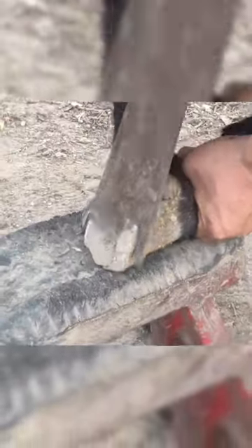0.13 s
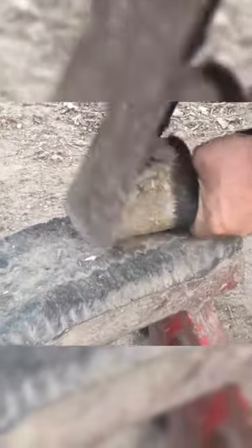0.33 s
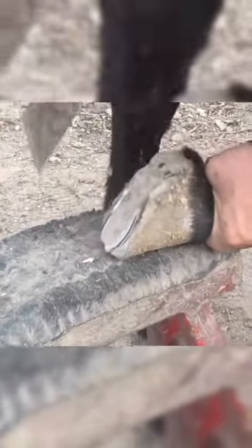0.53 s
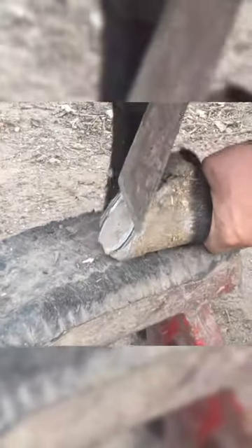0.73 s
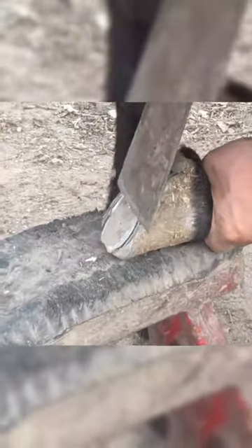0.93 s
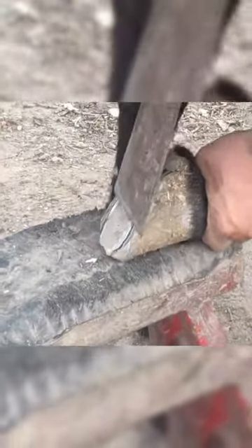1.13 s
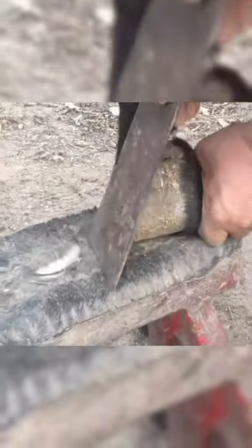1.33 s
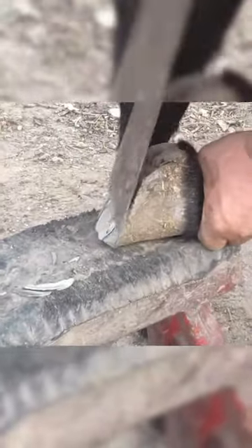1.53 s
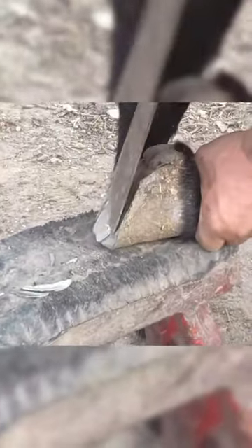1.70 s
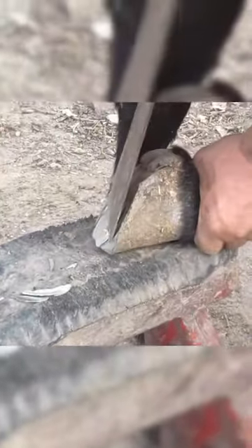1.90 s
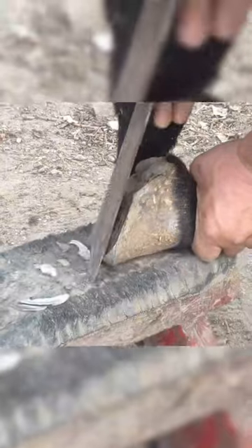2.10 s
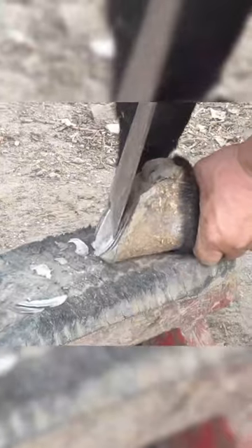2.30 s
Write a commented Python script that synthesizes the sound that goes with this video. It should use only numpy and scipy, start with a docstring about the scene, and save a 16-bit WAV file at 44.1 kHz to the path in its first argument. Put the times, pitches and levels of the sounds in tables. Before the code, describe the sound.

Blade slicing a hoof, close and dry outdoors, over faint hiss mostly left. Crackling crunch from 0.15 s swells with a squeak into hard clacks and a low wobbling thud at 0.22; the slice patters down at 0.3. Rustle at 0.64, steel scuffs and rings at 0.76. Softer cut and thud at 1.3, rustles, falling scrape at 1.95, sharp cut and thump at 2.06, chip tick at 2.27.

```python
"""A faint hiss, mostly on the left, then a crunch: a broad blade pares a hoof on a padded stand, outdoors.
Three times horn crackles under the edge, as dense random grains shaped by a spectrum, and breaks free.
The blade then knocks down and the stand thuds and wobbles, all as sums of damped sines.
In between the blade is set back on the hoof, its steel ringing in damped sines; chips tick,
the edge squeaks and scrapes in narrow noise bands, and clothing rustles as grainy band noise."""
import sys
import numpy as np
from scipy import signal
from scipy.fft import rfft, irfft
from scipy.io import wavfile

SR = 44100
rng = np.random.default_rng(int(sys.argv[2]) if len(sys.argv) > 2 else 0)


def unload_wav(signal):
    """Save mono or channel-first audio to the path in sys.argv[1] as 16-bit WAV at rate SR, clipped to [-1, 1]."""
    wavfile.write(
        sys.argv[1],
        SR,
        np.round(np.clip(np.atleast_2d(signal).T, -1, 1) * 32767).astype(np.int16),
    )


N = 103635
TIME = np.arange(N) / SR  # seconds

# Noise of loose bits shivering on the stand. Each row: frequency in Hz, relative level in dB per Hz.
SHIVER_SPECTRUM = [(40, 3.5), (120, 16), (250, 4), (450, -2.5), (1000, -1.5), (2000, -6), (4000, -16.5),
                   (8000, -24), (15000, -36)]
SHARED_BASS_HZ = 343  # below this the two sides share one noise
SQUEAK_WIDTH_HZ = 62
RUB_PAN_DB, HORN_PAN_DB = 16.5, 14


def amp(db):
    """Logarithmic level: decibels to amplitude gain."""
    return 10 ** (np.asarray(db) / 20)


def rms_one(x):
    """Normalization of power: scale to rms 1."""
    return x / np.sqrt(np.mean(x ** 2) + 1e-20)


def pan(db):
    """Interaural level difference: left louder than right by db, the louder side at gain 1."""
    gains = amp(np.array([[db], [-db]]) / 2)
    return gains / gains.max()


def curve(points):
    """Linear interpolation in time through rows of (seconds, value)."""
    return np.interp(TIME, *np.transpose(points))


def soften(x, hz, order=1):
    """Low-pass filtering."""
    sos = signal.butter(order, hz, fs=SR, output="sos")
    return signal.sosfilt(sos, x + 1e-18)


def thin(x, hz, order=2):
    """High-pass filtering."""
    sos = signal.butter(order, hz, "high", fs=SR, output="sos")
    return signal.sosfilt(sos, x + 1e-18)


def colour(x, points, ripple_db=4):
    """Spectral shaping: many small resonances ripple the given spectrum; rms 1."""
    ripple_width_hz = 130
    hz, db = np.transpose(points)
    f = np.maximum(np.fft.rfftfreq(N, 1 / SR), 1)
    heights = np.minimum(rng.standard_normal(len(f)), 1)  # dips go deeper than peaks
    ripple = ripple_db * np.interp(f / ripple_width_hz, np.arange(len(f)), heights)
    spectrum_db = np.interp(np.log(f), np.log(hz), db)
    return rms_one(irfft(rfft(x) * amp(spectrum_db + ripple), N))


def noise():
    """Partial coherence: white noise, a little alike in both ears."""
    return 0.5 * rng.standard_normal(N) + rng.standard_normal((2, N))


def grains():
    """Random point process: dense tiny fractures of uneven size."""
    fractures_per_s, spread_db = 6000, 2.2
    sizes = amp(spread_db * np.minimum(rng.exponential(1, N), 4))
    return noise() * sizes * (rng.random(N) < fractures_per_s / SR)


def flutter(hz):
    """Random modulation: noise slower than hz; rms 1."""
    return rms_one(soften(rng.standard_normal(N), hz, order=3))


def rough_tone(hz, width_hz):
    """Quadrature modulation: a narrow noise band, width_hz to each side of a pitch curve."""
    phase = 2 * np.pi * np.cumsum(hz) / SR
    return flutter(width_hz) * np.sin(phase) + flutter(width_hz) * np.cos(phase)


def decay(s, t60):
    """Exponential damping: jumps to 1 at time s and falls 60 dB in t60 seconds."""
    return (TIME >= s) * amp(-60 * np.clip((TIME - s) / t60, 0, 4))


def strike(s, modes, ratio=1):
    """Modal superposition: damped sines started at time s, their phases scaled by ratio."""
    age = TIME - s
    return sum(amp(db) * decay(s, t60) * np.sin(2 * np.pi * hz * ratio * age) for hz, db, t60 in modes)


def swell(start, end, rise, fall):
    """Growth and relaxation: Gaussian rise up to start, hold, exponential release after end."""
    return np.exp(-(np.maximum(start - TIME, 0) / rise) ** 2 - np.maximum(TIME - end, 0) / fall)


def slicing():
    """Brittle fracture: horn crackles ever harder under the edge until the slice breaks off."""
    # Each row: bite and break in seconds, level and level of the finest crackle in dB, swell up to
    # the break in dB.
    cuts = [(0.149, 0.221, -39.5, -48, 9.5), (1.253, 1.294, -43.5, -54.5, 7.5),
            (2.034, 2.06, -37.5, -52.5, 11.5)]
    # Tearing horn, then its finest crackle. Each row: frequency in Hz, relative level in dB per Hz.
    horn_spectrum = [(60, -43), (170, -11.5), (400, -20), (1000, -0.5), (1450, -4.5), (1800, 2),
                     (2500, 0.5), (3400, -9), (4400, -9), (5700, 5.5), (6700, -14.5), (9000, -27.5)]
    crackle_spectrum = [(3000, -4), (6000, 3), (8500, 4.5), (12000, -3), (15500, -1)]
    bite_s, release_s = 0.012, 0.012

    horn = colour(grains(), horn_spectrum) * pan(HORN_PAN_DB)
    crackle = colour(grains(), crackle_spectrum) * pan(-3.5)
    out = 0
    for start, end, db, crackle_db, swell_db in cuts:
        growth = amp(swell_db * np.clip((TIME - end) / (end - start), -1, 0))  # 1 at the break
        force = swell(start, end, bite_s, release_s) * growth
        out = out + force * (amp(db) * horn + amp(crackle_db) * crackle)
    return out


def squeaks():
    """Stick-slip friction: the edge catches on the horn in short gliding rasps."""
    # Each row: peak, rise and fall in seconds, level in dB, pitch at the peak in Hz,
    # glide in octaves per second, left-over-right pan in dB.
    slips = [(0.204, 0.01, 0.0074, -44.5, 2340, 3.5, -13), (1.287, 0.0078, 0.011, -45, 2757, 5, 1),
             (1.468, 0.0098, 0.07, -62.5, 2855, 0.092, 11)]
    out = 0
    for s, rise, fall, db, hz, glide, side in slips:
        pitch = hz * 2 ** (glide * np.clip(TIME - s, -0.1, 0.1))
        rasp = rough_tone(pitch, SQUEAK_WIDTH_HZ)
        out = out + amp(db) * pan(side) * swell(s, s, rise, fall) * rasp
    return out


def scrape():
    """Sliding friction: the edge skids before the last cut, a gritty rasp and thin squeal falling in pitch."""
    # Each row: time in seconds, pitch in Hz, level of each of the two bands in dB.
    path = [(1.925, 3750, -71), (1.945, 3550, -47), (1.953, 2900, -55.5), (1.963, 2327, -50),
            (2.013, 1860, -65)]
    rasp_width_hz = 410
    s, hz, db = np.transpose(path)
    pitch = np.interp(TIME, s, hz)
    level = amp(np.interp(TIME, s, db)) * (TIME > s[0]) * (TIME < s[-1])
    squeal = rough_tone(pitch, SQUEAK_WIDTH_HZ)
    rasp = rough_tone(pitch, rasp_width_hz)
    return level * (squeal + rasp) * pan(RUB_PAN_DB)


def knocks():
    """Impact excitation: each contact of the freed blade is a dead clack that also rings the hoof."""
    # Each row: time in seconds, level in dB, clack pitch in Hz, left-over-right pan in dB.
    contacts = [(0.2141, -22.5, 1130, 1.5), (0.2180, -17.5, 1144, 9.5), (0.2211, -27, 630, 4.5),
                (0.2313, -31.5, 1400, 12), (1.2956, -20, 876, 9.5), (1.2983, -28.5, 830, 5),
                (1.3036, -28, 1038, 7.5), (2.0581, -25.5, 956, 9), (2.0613, -18, 1830, 19),
                (2.063, -33, 2620, 1), (2.0637, -28, 690, 3), (2.08, -33.5, 1410, 11)]
    # Each row: frequency in Hz, level relative to the contact in dB, T60 in seconds.
    hoof_modes = [(824, -21, 0.044), (1098, -9, 0.037), (1280, -22.5, 0.052), (1753, -19, 0.036),
                  (2910, -28.5, 0.048), (5900, -27, 0.0078)]
    clack_t60_s, clack_soft_hz = 0.024, 2720
    out = 0
    for s, db, hz, side in contacts:
        clack = soften(strike(s, [(hz, 0, clack_t60_s)]), clack_soft_hz)
        out = out + amp(db) * pan(side) * (clack + strike(s, hoof_modes))
    return thin(out, 420, order=1)


def stand():
    """Damped resonance: a first press and then the full weight thump, wobble and shiver the padded stand."""
    # Each row: time in seconds, thump level in dB, thump pitch ratio, wobble and shiver levels in dB.
    thuds = [(0.2209, -22.5, 0.95, -25, -39.5), (1.3052, -30, 0.87, -30.5, -44.5),
             (2.0655, -25, 0.97, -25, -42)]
    # The thump, then the wobble before settling. Each row: frequency in Hz, relative level in dB,
    # T60 in seconds.
    thump_modes = [(238.4, -4, 0.076), (281.5, -1, 0.05), (500, -13, 0.018)]
    wobble_modes = [(99.6, -32, 0.63), (132.96, -9.5, 0.37), (256.7, -29, 0.46)]
    press_lead_s, press_db = 0.00721, -8
    phase_sag_per_s, phase_jitter = 0.307, 0.01  # the growing phase lag makes the pitch sink
    settle_s, rough_db, shiver_t60_s = 0.25, 2.5, 0.38
    pad_soft_hz, low_hz = 860, 89

    body = shaking = 0
    for s, db, ratio, wobble_db, shiver_db in thuds:
        age = np.clip(TIME - s, 0, 1)
        uneven = amp(rough_db * flutter(45) * np.minimum(age / 0.019, 1))
        settling = np.exp(-(age / settle_s) ** 4)  # friction stops the wobble
        phase_ratio = 1 - phase_sag_per_s * age + phase_jitter * flutter(21)
        for start, force in ((s - press_lead_s, amp(press_db)), (s, 1)):
            thump = amp(db) * strike(start, thump_modes, ratio)
            wobble = amp(wobble_db) * uneven * settling * strike(start, wobble_modes, phase_ratio)
            body = body + force * (thump + wobble)
        shaking = shaking + amp(shiver_db) * decay(s, shiver_t60_s)

    rattle = colour(grains(), SHIVER_SPECTRUM) * rms_one(amp(1.9 * flutter(45)))
    rattle = thin(rattle, SHARED_BASS_HZ, order=1) + soften(rattle[0], SHARED_BASS_HZ)
    body = thin(soften(body, pad_soft_hz), low_hz)
    return (body + shaking * rattle) * pan(4)


def slice_lands():
    """Multiple impacts: the first slice of horn tumbles over the pad with a dull rattle."""
    land_s, level_db, rise_s, fall_s = 0.299, -51, 0.0046, 0.04
    rattle = rms_one(thin(colour(grains(), SHIVER_SPECTRUM), 450))
    return amp(level_db) * swell(land_s, land_s, rise_s, fall_s) * rattle * pan(HORN_PAN_DB)


def blade_set():
    """Friction and modal ringing: the edge scuffs onto the horn, the steel's ring builds up and dies."""
    # Each row: frequency in Hz, relative level in dB, T60 in seconds.
    blade_modes = [(667, -11, 0.19), (742, -2.5, 0.079), (1250, -13, 0.09), (1616, 3.5, 0.1),
                   (2030, 0, 0.04), (2396, -2.5, 0.11), (2940, -8, 0.065), (3412, -2, 0.1)]
    # Scuff and soft tail. Each row: frequency in Hz, relative level in dB per Hz.
    scuff_spectrum = [(500, -6.5), (720, 0.5), (1500, 2), (3500, -7), (6000, -18.5), (15000, -40)]
    touch_s, slide_s, level_db = 0.7545, 0.008, -39.5
    scuff_db, scuff_fall_s = -1.5, 0.0057  # relative to level_db, as is the tail
    tail_db, tail_t60_s = -11.5, 0.32

    seated = touch_s + slide_s
    scuff = amp(scuff_db) * swell(seated, seated, slide_s, scuff_fall_s)
    tail = amp(tail_db) * decay(seated, tail_t60_s)
    grit = (TIME > touch_s) * (scuff + tail) * colour(noise(), scuff_spectrum)
    ring = np.clip((TIME - touch_s) / slide_s, 0, 1) * strike(touch_s, blade_modes)
    out = thin(amp(level_db) * (ring + grit), 580, order=4)
    return pan(9) * soften(out, 6670, order=2)


def chips():
    """Transient excitation: snapping horn chips crumble in bright ticks with a short, many-toned ring."""
    # Each row: time in seconds, level in dB, left-over-right pan in dB.
    ticks = [(0.159, -43.5, 0.5), (0.482, -57, 20), (2.0305, -51, 10), (2.0568, -55, 20), (2.217, -57, 1.5),
             (2.27, -43.5, 5.5)]
    # The crumble. Each row: frequency in Hz, relative level in dB per Hz.
    crumble_spectrum = [(800, -45), (2500, 4.5), (4300, -1.5), (5900, 16), (7800, -2), (11000, 2),
                        (15500, -23)]
    # The ring. Each row: frequency in Hz, level relative to the tick in dB.
    ring_tones = [(2840, -13), (3400, -15), (5930, -11.5), (6480, -26)]
    rise_s, crumble_t60_s, ring_t60_s = 0.0024, 0.061, 0.25

    crumble = colour(noise(), crumble_spectrum)
    modes = [(hz, db, ring_t60_s) for hz, db in ring_tones]
    out = 0
    for s, db, side in ticks:
        attack = np.clip((TIME - s) / rise_s, 0, 1)
        tick = crumble * decay(s, crumble_t60_s) + strike(s, modes)
        out = out + amp(db) * pan(side) * attack * tick
    return out


def rustles():
    """Random surface friction: sleeves and hands rub in grainy swishes, each around its own pitch."""
    # Each row: peak, rise and fall in seconds, level before filtering in dB, centre frequency in Hz.
    rubs = [(0.644, 0.014, 0.054, -57.5, 2860), (1.078, 0.053, 0.1, -55, 2520),
            (1.468, 0.016, 0.17, -61, 4260), (1.745, 0.023, 0.037, -51, 3290),
            (1.95, 0.028, 0.077, -53.5, 3240)]
    half_width_octaves, grain_db, grain_hz = 0.58, 1.6, 118
    hz = np.geomspace(200, 15000, 30)
    out = 0
    for s, rise, fall, db, centre in rubs:
        shape_db = -10 * np.log10(1 + (np.log2(hz / centre) / half_width_octaves) ** 4)
        out = out + amp(db) * swell(s, s, rise, fall) * colour(noise(), np.c_[hz, shape_db])
    grain = rms_one(amp(grain_db * flutter(grain_hz)))
    return thin(soften(out * grain, 6290, order=8), 1700, order=3) * pan(RUB_PAN_DB)


def background():
    """Incoherent superposition: faint noise, a wandering narrow band, a midrange band and a high hiss."""
    # Noise, then high hiss. Each row: frequency in Hz, relative level in dB per Hz.
    air_spectrum = [(25, -3.5), (55, 1), (90, -7), (200, -8.5), (450, -19), (630, -18.5), (830, -7),
                    (1100, -23), (1480, -10), (1900, 2), (2500, -3), (3200, -13.5), (5000, -23),
                    (9000, -61)]
    hiss_spectrum = [(2000, -27), (3600, 2), (5000, 2.5), (5800, 11), (6700, -2), (7500, -26.5),
                     (14000, -23.5)]
    # Each row: time in seconds, change of the noise level in dB.
    air_change = [(0, 2.5), (0.95, 0), (1.22, 0.5), (1.6, -2), (2.34, 1.5)]
    # High hiss, then midrange. Each row: time in seconds, level in dB.
    hiss_level = [(0, -63), (0.27, -61.5), (0.6, -70.5), (0.83, -67.5), (0.99, -75.5), (1.1, -65.5),
                  (1.36, -63.5), (1.66, -73.5), (1.9, -72.5), (2.34, -63)]
    mid_level = [(0, -65), (0.55, -72), (1.4, -69.5), (1.58, -88), (2.34, -74)]
    # Each row: time in seconds, centre of the wandering band in Hz, level in dB.
    whir_path = [(0, 701, -70), (0.428, 937.5, -62.5), (0.697, 827, -71.5), (1.0, 850, -86),
                 (1.241, 889.5, -59), (1.55, 841, -74), (1.821, 770, -66), (1.97, 808.5, -78)]
    air_db, whir_width_hz = -61, 77.3
    mid_hz, mid_width_hz = 1456, 160

    air = amp(air_db + curve(air_change)) * colour(noise(), air_spectrum)
    hiss = amp(curve(hiss_level)) * colour(noise(), hiss_spectrum)
    s, hz, db = np.transpose(whir_path)
    whir = amp(np.interp(TIME, s, db)) * rough_tone(np.interp(TIME, s, hz), whir_width_hz)
    midrange = amp(curve(mid_level)) * rough_tone(np.full(N, mid_hz), mid_width_hz)
    right_bass = soften(air[0], SHARED_BASS_HZ) * np.array([[0], [0.55]])  # the left's bass, also on the right
    return (air + hiss + whir + midrange) * pan(21) + right_bass


def scene():
    """Linear superposition of all sources; knocks and stand push with opposite polarity."""
    cutting = slicing() + squeaks() + scrape()
    impacts = slice_lands() - knocks() - stand()
    handling = blade_set() + chips() + rustles()
    return cutting + impacts + handling + background()


def record(dry):
    """Band limiting: a steep elliptic low-pass cuts the top."""
    cutoff_hz = 15700
    return signal.sosfilt(signal.ellip(10, 0.2, 70, cutoff_hz, fs=SR, output="sos"), dry)


dry = scene()
out = record(dry)
unload_wav(out)
```